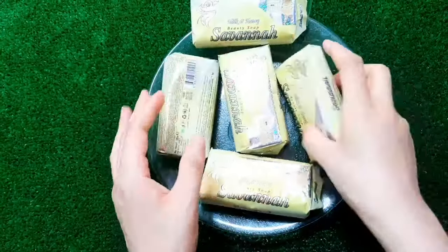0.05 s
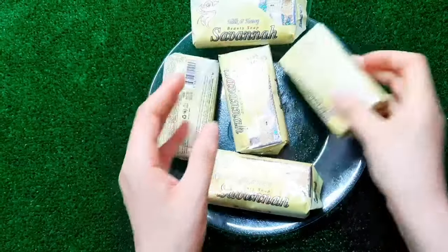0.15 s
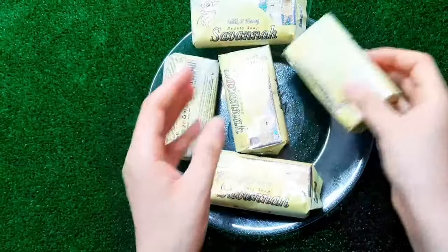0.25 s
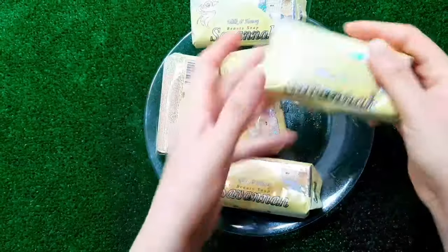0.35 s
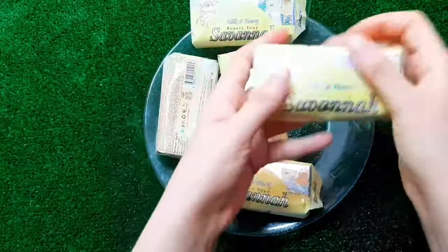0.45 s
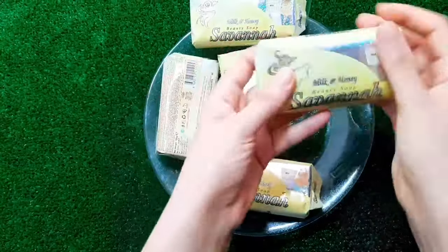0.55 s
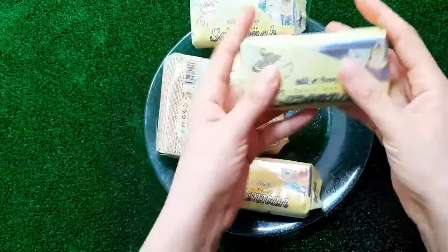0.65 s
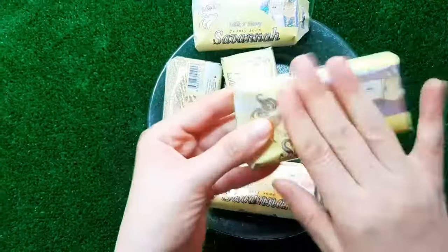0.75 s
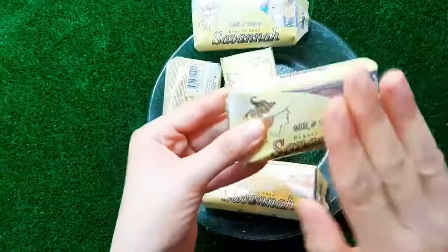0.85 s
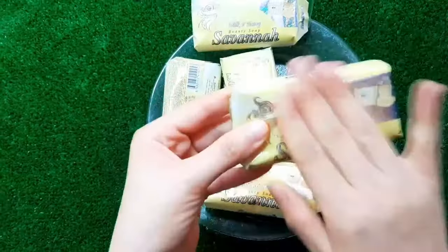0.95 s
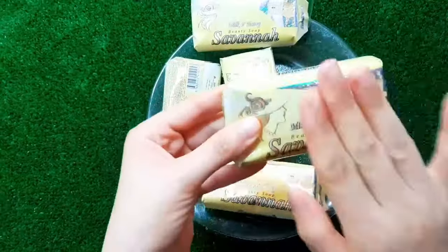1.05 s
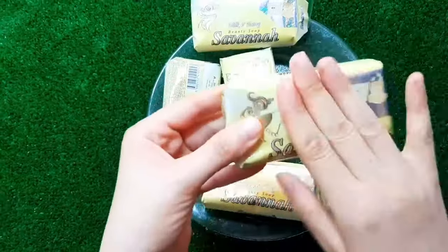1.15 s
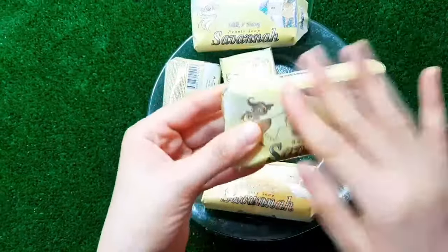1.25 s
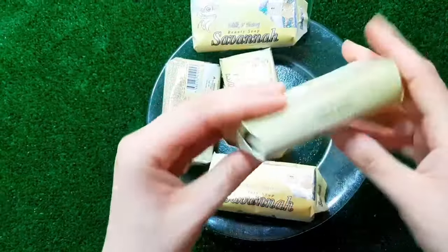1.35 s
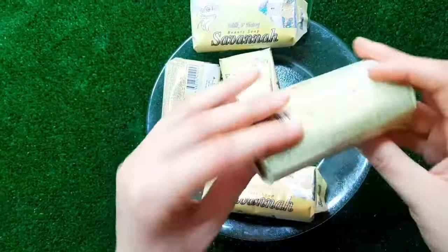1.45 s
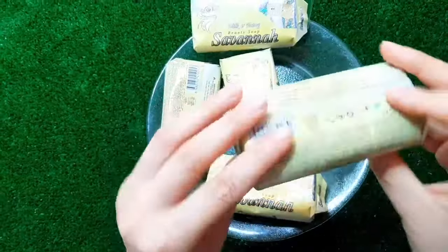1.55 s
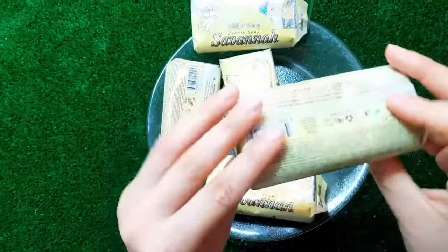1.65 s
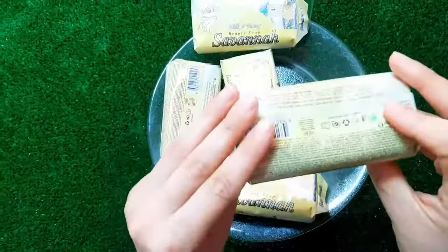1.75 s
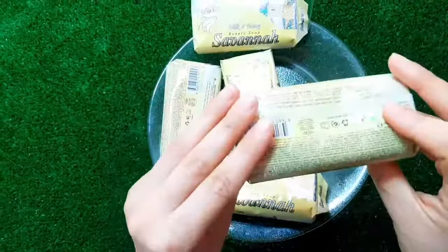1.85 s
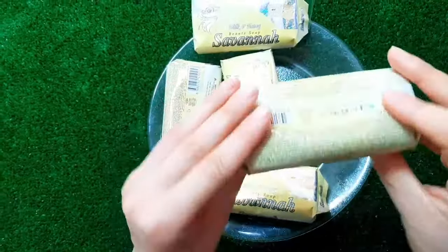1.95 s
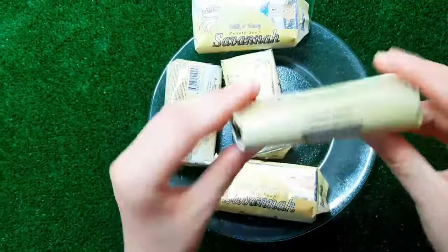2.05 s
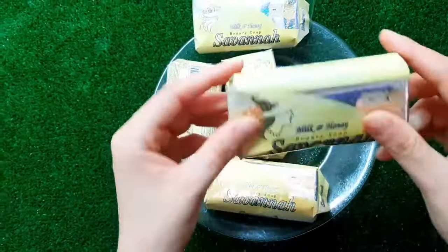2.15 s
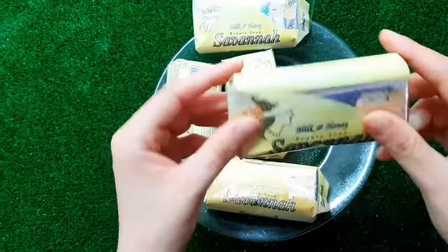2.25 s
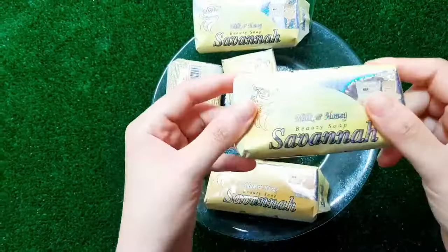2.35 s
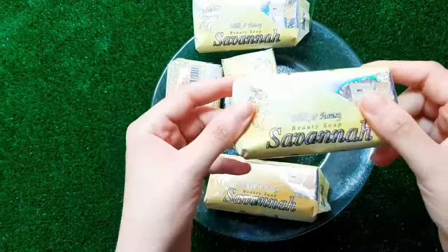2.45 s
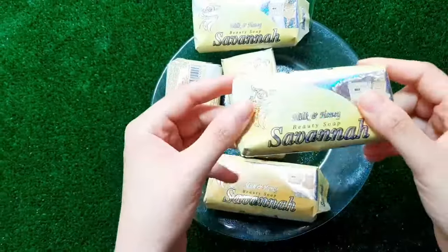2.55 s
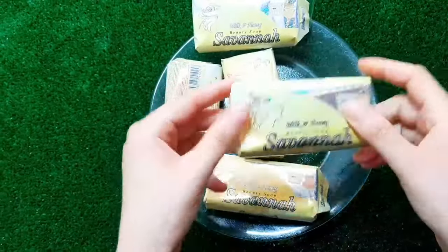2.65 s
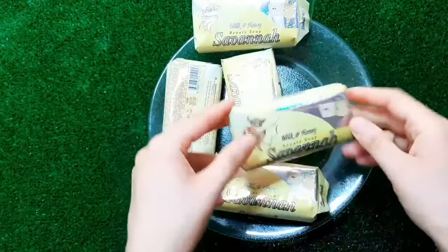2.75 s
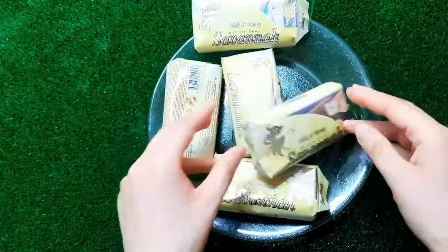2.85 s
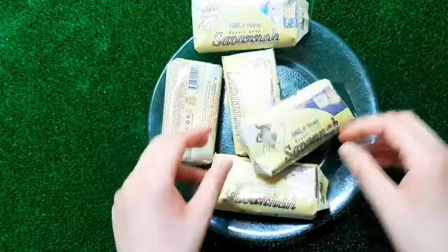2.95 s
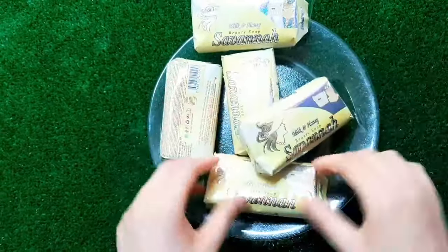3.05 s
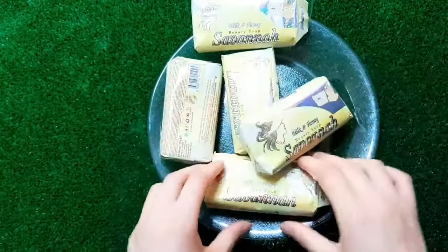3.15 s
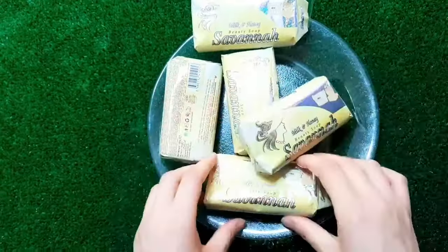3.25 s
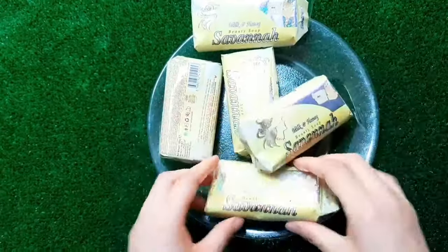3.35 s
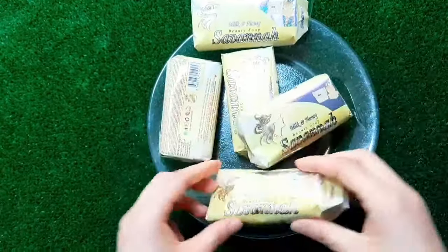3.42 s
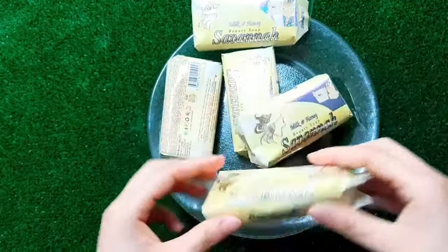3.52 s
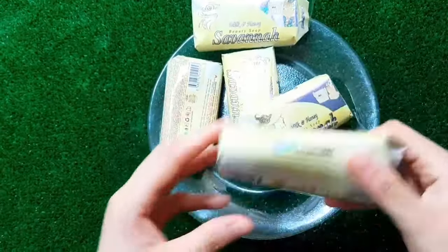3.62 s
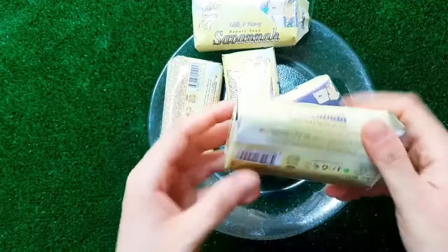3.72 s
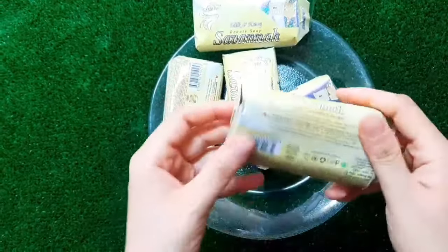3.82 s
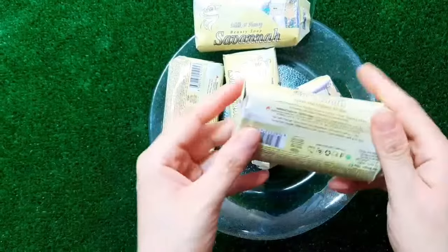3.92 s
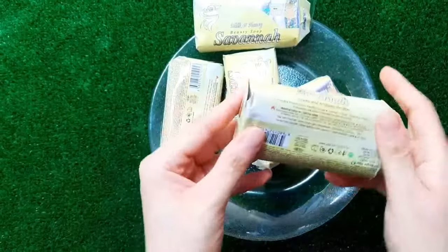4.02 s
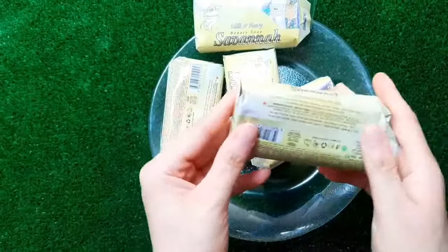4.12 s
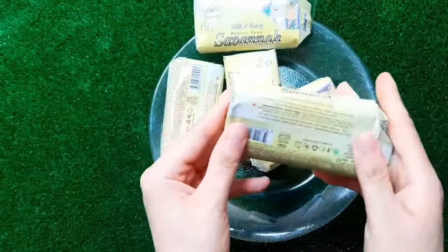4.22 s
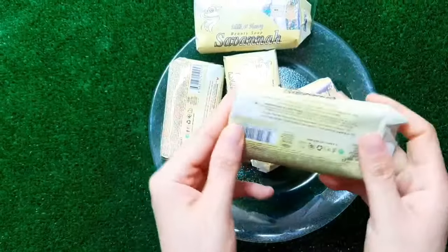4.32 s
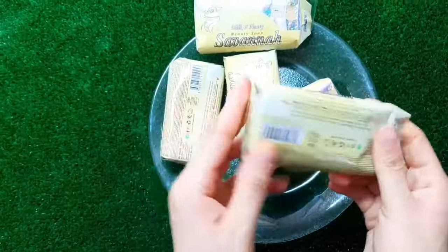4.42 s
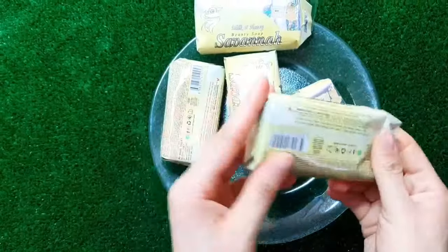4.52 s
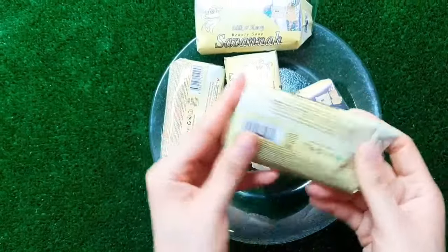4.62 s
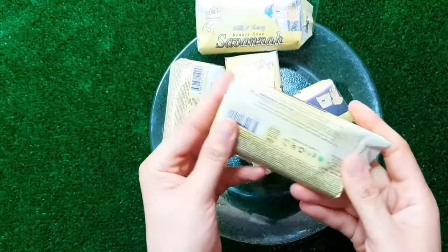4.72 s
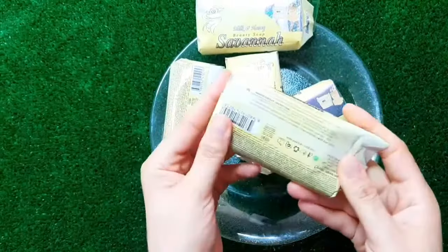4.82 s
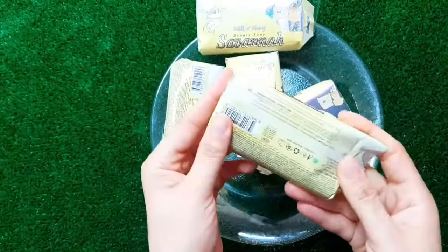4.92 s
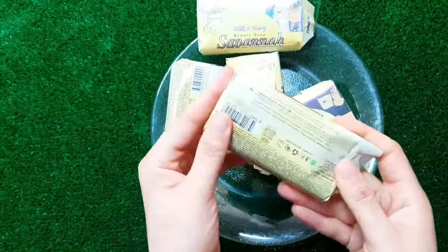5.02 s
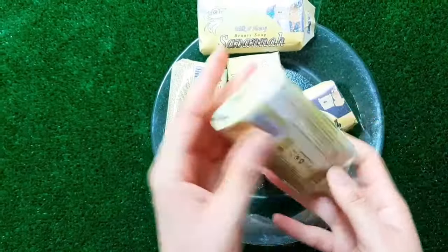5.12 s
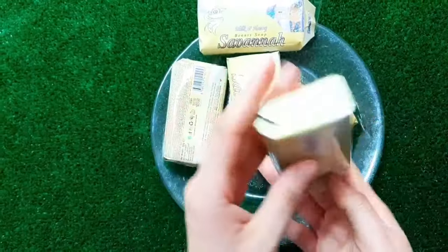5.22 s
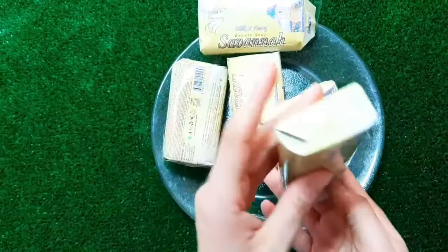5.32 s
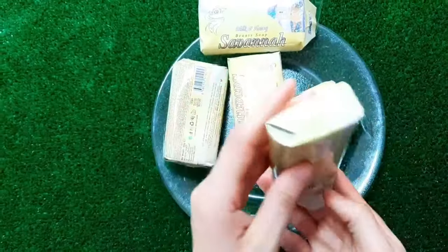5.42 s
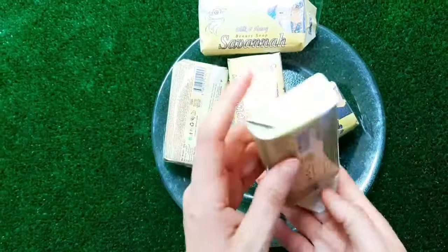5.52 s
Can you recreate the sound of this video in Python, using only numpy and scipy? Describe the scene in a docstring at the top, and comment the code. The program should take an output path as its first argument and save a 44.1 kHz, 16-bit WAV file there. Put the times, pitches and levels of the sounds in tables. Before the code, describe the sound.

In a small room, close to the left microphone, fingers slide over the paper wrapper of a soap bar and give it three sharp pats. After a few more crinkles the bar lands loudly on a glass plate, which rings briefly over a low boom. Irregular snaps and rustles follow as the next bar is turned over. The right microphone carries little but low rumble and a few soft bumps.

```python
"""Paper wrappers rustle and snap close by as hands turn soap bars over a glass plate in a small room.
Fingers slap one bar three times; it is set down with a hard clack that rings the glass and draws a low
boom from the room, and the next is picked up. The left microphone hears it all and overloads on the
hardest blows; the right one is nearly deaf and carries rumble and soft thumps."""
import sys
import numpy as np
from scipy import signal
from scipy.fft import rfft, irfft, next_fast_len
from scipy.io import wavfile
from scipy.ndimage import map_coordinates

SR = 44100
rng = np.random.default_rng(int(sys.argv[2]) if len(sys.argv) > 2 else 0)


def generate_wav(sig):
    """Save sig (samples, or channels by samples) to the path in sys.argv[1] as 16-bit PCM at SR."""
    pcm = np.round(np.clip(np.atleast_2d(sig).T, -1, 1) * 32767).astype(np.int16)
    wavfile.write(sys.argv[1], SR, pcm)


N = 245637


def strokes():
    """Skin drags slowly over paper as a bar is lifted or turned."""
    # drags of the fingers: start/s, end/s, level/dB, brightness/dB
    drags = [(-0.02, 0.062, -55.5, -6), (0.06, 0.353, -65, -2.5), (0.45, 0.702, -58.5, 1),
             (1.263, 1.417, -55, 2.5), (1.409, 1.61, -65.5, 7.5), (2.011, 2.19, -55.5, 3),
             (2.573, 2.746, -62, 10), (2.759, 2.807, -46.5, 3.5), (2.951, 3.035, -53, -6.5),
             (3.053, 3.174, -58.5, -1.5), (3.17, 3.317, -67, 1), (3.307, 3.454, -54.5, 2.5),
             (3.427, 3.595, -59, -7.5), (3.634, 4.007, -59, -2), (4.065, 4.226, -65.5, -9),
             (4.238, 4.337, -51.5, -5), (4.334, 4.48, -54, 5), (4.485, 4.625, -66, 0.5),
             (4.657, 4.727, -59.5, -6.5), (4.94, 5.092, -65, 3), (5.046, 5.209, -55, 2.5),
             (5.29, 5.38, -56, -2), (5.384, 5.492, -63.5, 0)]
    parts = friction(ticks_per_s=900, spread_db=4, hiss=.6)
    out = slide(parts, db=-74.5, brightness_db=5)  # a held wrapper never lies quite still
    for start, end, db, brightness_db in drags:
        out += gesture(start, end, rise=0.029, fall=0.0086) * slide(parts, db, brightness_db)
    return out


def swipes():
    """A faster finger packs the ticks into a short swish."""
    # swipes along a wrapper: start/s, end/s, level/dB, brightness/dB
    swishes = [(0.414, 0.451, -41, 3.5), (0.479, 0.511, -40, 3), (0.604, 0.643, -51, 13.5),
               (1.317, 1.385, -43, 3), (2.032, 2.087, -46, 9), (3.096, 3.122, -47.5, 4.5),
               (3.281, 3.324, -47, 2.5), (3.627, 3.645, -39, 1), (3.723, 3.752, -39, 3),
               (4.039, 4.109, -46, -2.5), (4.27, 4.29, -47, -1), (4.627, 4.667, -38, 3),
               (5.104, 5.166, -48, 1), (5.24, 5.288, -45, 15), (5.436, 5.462, -46.5, 9)]
    parts = friction(ticks_per_s=2200, spread_db=2, hiss=0.4)
    out = np.zeros(N)
    for start, end, db, brightness_db in swishes:
        length = end - start
        out += gesture(start, end, rise=.4 * length, fall=.45 * length) * slide(parts, db, brightness_db)
    return out


def friction(ticks_per_s, spread_db, hiss):
    """Clumps of stick-slip ticks, larger crackles and hiss drive a dull rub, a rustle and a fine fizz."""
    # spectra of skin on paper: f/Hz, level/dB
    rub = [(120, -23), (300, 1.5), (650, -6), (1100, 0.5), (1800, -6.5), (3000, -22), (6000, -50.5)]
    rustle = [(900, -34), (2200, 0.5), (4000, 0.5), (6600, 0), (7800, -15), (11000, -37.5)]
    fizz = [(6000, -20), (7800, -1.5), (11500, 14), (16000, 5.5)]
    sizes = rng.choice([-1, 1], N) * amp(spread_db * np.clip(rng.standard_normal(N), -2, 2))
    chance = rng.random(N) * SR
    ticks = unit(sizes * (chance < ticks_per_s))
    crackles = 0.47 * unit(sizes * (chance < 70))
    clumps = map_coordinates(rng.standard_normal(N // 700 + 4), [np.arange(N) / 700])
    slips = (ticks + crackles + hiss * rng.standard_normal(N)) * amp(2.2 * clumps - 1.3)
    return [shaped(slips, spectrum) for spectrum in (rub, rustle, fizz)]


def slide(parts, db, brightness_db):
    """A light, bright touch trades the dull rub for fizz."""
    rub, rustle, fizz = parts
    return amp(db) * (amp(-brightness_db) * rub + rustle + amp(-12.5 + .4 * brightness_db) * fizz)


def snaps():
    """A crease flips in a millisecond and rings its patch of paper, most strongly near its pitch."""
    # creases that buckle: t/s, level/dB, pitch/Hz
    creases = [(0.1406, -51, 5000), (0.21, -48, 5000), (0.4952, -36.5, 3300), (0.564, -44, 1700),
               (0.655, -32, 5800), (0.7074, -36.5, 1600), (0.716, -29.5, 4670), (1.253, -34.5, 4320),
               (1.2894, -19.5, 3700), (1.565, -36, 5570), (2.041, -32, 7900), (2.0565, -22.5, 7600),
               (2.17, -34, 7600), (2.6596, -44.5, 4500), (2.6907, -47, 2000), (2.7364, -37.5, 1100),
               (2.977, -27.5, 2470), (3.098, -31, 3060), (3.292, -36, 4600), (3.631, -27, 2640),
               (3.8138, -26.5, 3900), (3.8307, -24, 1710), (3.853, -25.5, 5440), (3.907, -26, 2620),
               (3.9471, -28.5, 3800), (4.0087, -41, 6000), (4.0991, -26.5, 8500), (4.1948, -25, 2600),
               (4.239, -32.5, 3400), (4.2636, -29.5, 1420), (4.2849, -24, 3570), (4.3132, -29, 2700),
               (4.3692, -23.5, 3880), (4.466, -41.5, 6300), (4.5841, -22.5, 5730), (4.7042, -34, 2380),
               (5.0912, -32, 2600), (5.2568, -28.5, 3480), (5.31, -24.5, 2520), (5.36, -42, 2000),
               (5.4104, -36, 1280)]
    # pop, crack, tick and sizzle: low/Hz, high/Hz
    bands = [(850, 2200), (2200, 4400), (4400, 6700), (7300, 16000)]
    paper_db, fall_db_per_octave = np.array([1.5, -3.5, -1.5, -7.5]), 11
    out = np.zeros(N)
    for s, db, pitch_hz in creases:
        octaves_off = np.abs(np.log2(centres(bands) / pitch_hz))
        levels = db + paper_db - fall_db_per_octave * octaves_off
        add(out, s, blow(bands, levels, fall=0.0016, ring_cycles=1.0))
    return out


def slaps_and_sharp_snaps():
    """Finger slaps on the wrapped bar, plus two sharp snaps; the room or plate rings briefly after each."""
    # slaps, and snaps at 2.18 and 3.48 s: t/s, smack/dB, hardness/(dB per octave), thud/dB, sizzle/dB
    hits = [(0.575, -35.5, -5.5, -27, -50), (0.7502, -15.5, -2.2, -13.5, -23),
            (0.9619, -15, 2.5, -17, -28.5), (1.1282, -17, 1.94, -19, -29.5),
            (2.1772, -31.5, -.5, -45.5, -52), (3.4039, -42.5, -11, -38.5, -65),
            (3.4763, -17.5, 1.6, -30, -29)]
    # the thud, four bands of smack, the sizzle: low/Hz, high/Hz
    bands = [(170, 480), (720, 1250), (1250, 2400), (2400, 4400), (4400, 6700), (7300, 16000)]
    # hollow ring of the room or plate: f/Hz, level/dB, t60/s
    ring_modes = [(358, -8, 0.14), (485, -20, 0.072), (1010, -9, 0.08)]
    colour_db, pivot_hz = np.array([-1, 0.33, 1, 0.89]), 3120
    octaves = np.log2(centres(bands[1:-1]) / pivot_hz)
    out, t = np.zeros(N), clock(8192)
    for s, smack_db, hardness, thud_db, sizzle_db in hits:
        smack = smack_db + colour_db + hardness * octaves
        softness = amp(.5 * (thud_db - smack_db))  # a dull contact lasts longer than a sharp one
        add(out, s, blow(bands, [thud_db, *smack, sizzle_db], fall=.0019 * softness, ring_cycles=0.3))
        for hz, db, t60 in ring_modes:
            note = np.sin(2 * np.pi * (hz * t + rng.random())) * (1 - np.exp(-t / 0.0021))
            add(out, s, amp(thud_db + db - 60 * t / t60) * note)
    return out


def landing():
    """The bar lands and rocks: each contact crushes the wrapper and rings the loaded plate."""
    # contacts with the plate: t/s, level/dB, favoured f/Hz
    contacts = [(2.8149, -15, 1740), (2.8222, -4, 1600), (2.848, -18.5, 1410), (2.884, -30, 1440),
                (2.8895, -24.5, 1060), (2.92, -34, 1010)]
    # modes of the glass: f/Hz, level/dB, t60/s
    plate_modes = [(776, -28.5, 0.085), (1070, -19, 0.073), (1160, -22.5, 0.21), (1366, -10.5, 0.11),
                   (1470, -2, 0.027), (1640, -5, 0.085), (1890, -19, 0.037), (2080, -15, 0.067),
                   (3570, -15.5, 0.019), (3680, -18.5, 0.033), (4700, -23, 0.031), (6200, -29.5, 0.045)]
    # wrapper squashed under the bar: f/Hz, level/dB
    crush_spectrum = [(60, -13.5), (150, 5.5), (400, 1.5), (1200, 3), (4000, -3.5), (6700, -9.5),
                      (7800, -19), (16000, -28.5)]
    out, t = np.zeros(N), clock(8192)
    hz = np.fft.rfftfreq(len(t), 1 / SR)
    choke = (1 - np.exp(-t / 0.0012)) * np.exp(-(t / 0.023) ** 2)  # the settling bar damps the glass
    for s, db, favoured_hz in contacts:
        ring = np.zeros(len(t))
        for mode_hz, level_db, t60 in plate_modes:
            favour_db = 5 / (1 + ((mode_hz - favoured_hz) / 90) ** 2)
            chatter = np.cumsum(rng.standard_normal(len(t))) * .004
            tone = np.sin(2 * np.pi * (mode_hz * t + chatter + rng.random()))
            ring += amp(level_db + favour_db - 60 * t / t60) * tone
        crush = causal(burst(t, rise=0.0012, fall=0.022), along(crush_spectrum, hz))
        add(out, s, amp(db) * lasting(ring * choke, seconds=.009))
        add(out, s, amp(db - 5.5) * lasting(crush, seconds=0.0028))
    return out


def scrapes():
    """A sliding bar excites a single hollow resonance."""
    # slides of a bar: start/s, end/s, level/dB, f/Hz
    slides = [(0.183, 0.245, -64, 2740), (2.763, 2.805, -44, 1110), (3.398, 3.44, -42, 582),
              (3.56, 3.665, -50, 840), (3.938, 4.15, -55, 487), (4.569, 4.665, -47.5, 803)]
    out = np.zeros(N)
    for start, end, db, hz in slides:
        hollow = bandpass(rng.standard_normal(N), [hz / 1.08, hz * 1.08], order=2)
        out += amp(db) * gesture(start, end, rise=0.011, fall=0.018) * unit(hollow)
    return out


def low_boom():
    """A bump sets off a brief low ring of the room near 140 Hz."""
    # booms of the room's low mode: t/s, level/dB, f/Hz
    booms = [(2.843, -26, 138.8), (4.491, -36.5, 138.6)]
    out, t, t60 = np.zeros(N), clock(32768), .5
    for s, db, hz in booms:
        pair = np.sin(2 * np.pi * hz * t) + .5 * np.sin(2 * np.pi * 0.9 * hz * t)
        add(out, s, amp(db - 60 * t / t60) * (1 - np.exp(-t / 0.0013)) * pair)
    return out


def shuffle():
    """Low handling noise dies away after the first bar is lifted."""
    # f/Hz, level/dB
    spectrum = [(20, -3.5), (45, 2), (170, 3.5), (330, -11.5), (900, -20.5), (3000, -66.5)]
    return shaped(rng.standard_normal(N), spectrum) * amp(-44 - 17.5 * clock(N))  # fades 17.5 dB/s


def room(x, early_db, late_db):
    """Near surfaces answer within milliseconds, then the walls; the paths change as the hands move."""
    # decay of the room: f/Hz, t60/s
    decay = [(150, 0.7), (300, 0.26), (1200, 0.2), (5000, 0.23), (12000, 0.22)]
    # colour of its tail: f/Hz, level/dB
    colour = [(120, -4), (350, 2), (1200, 8.5), (4000, 2), (12000, 3.5)]
    out, t, block = np.zeros(N), clock(16384), SR // 6
    for start in range(0, N, block):
        hz, lag, noise = signal.stft(rng.standard_normal(len(t)), SR, nperseg=256)
        fading_db = along(colour, hz)[:, None] - 60 * lag / along(decay, hz)[:, None]
        late = signal.istft(noise * amp(fading_db), SR)[1] * (1 - np.exp(-t / 0.012))
        early = burst(t, rise=.0065, fall=0.0044)
        answer = amp(early_db) * early / np.linalg.norm(early)
        answer += amp(late_db) * late / np.linalg.norm(late)
        add(out, start / SR, signal.fftconvolve(x[start:start + block], answer))
    return out


def thumps():
    """A soft push on the right microphone: one or two slow swings after a brief harder edge."""
    # pushes: t/s, level/dB, f/Hz, edge/dB
    pushes = [(1.503, -22.5, 220, -47.5), (1.512, -23, 98, -56), (3.797, -37, 98, -60),
              (4.493, -31, 65.5, -56), (5.032, -23.5, 95, -44.5), (5.137, -26, 96, -55.5),
              (5.266, -26.5, 89, -78), (5.359, -28.5, 98, -74)]
    out, t = np.zeros(N), clock(4096)
    for s, db, hz, edge_db in pushes:
        age = t * hz / 0.38
        swell = (age * np.exp(1 - age)) ** 2
        add(out, s, amp(db + 6.0) * swell * np.sin(2 * np.pi * hz * t))
        add(out, s + 0.00056, blow([(240, 520)], [edge_db + 9.5], fall=0.0009, ring_cycles=0.28))
    return coloured(out, lambda hz: hz ** 2 / (hz ** 2 + 40 ** 2))  # low cut at 40 Hz


def hush():
    """Faint, steady background at the left microphone."""
    # noise floor: f/Hz, level/dB
    spectrum = [(25, -14.5), (60, -6.5), (150, 6.5), (220, 1.5), (320, -11), (500, -12), (900, -11.5),
                (1200, -26.5), (2500, -26.5), (16000, -28)]
    return amp(-58.5) * shaped(rng.standard_normal(N), spectrum)


def rumble():
    """Steady low noise on the right microphone."""
    # noise floor: f/Hz, level/dB
    spectrum = [(24, -21), (42, 7), (100, 4.5), (150, -5.5), (220, -14.5), (330, -22), (500, -32),
                (2000, -34.5), (16000, -36.5)]
    return amp(-52.0) * shaped(rng.standard_normal(N), spectrum)


def blow(bands, levels, fall, ring_cycles):
    """One sharp push rings each band at its own level (dB over 4 ms); low bands ring longer."""
    t = clock(2048)
    sound = np.zeros(len(t))
    for band, db in zip(bands, levels):
        puff = burst(t, rise=0.00081, fall=fall + ring_cycles / band[0])
        sound += amp(db) * lasting(bandpass(puff, band, order=4), seconds=.004)
    return sound


def burst(t, rise, fall):
    """A puff of noise that swells for rise seconds and then dies away."""
    swell = np.minimum(t / rise, 1) ** 4
    return rng.standard_normal(len(t)) * swell * np.exp(-np.maximum(t - rise, 0) / fall)


def gesture(start, end, rise, fall):
    """Gain of a movement that swells, holds and lets go."""
    return np.interp(clock(N), [start - rise, start + rise, end - fall, end + fall], [0, 1, 1, 0])


def bandpass(x, band, order):
    """Pass the band (low/Hz, high/Hz)."""
    return signal.sosfilt(signal.butter(order, band, 'bandpass', fs=SR, output='sos'), x)


def coloured(x, gain):
    """x times a gain that depends on frequency."""
    size = next_fast_len(N + 8192)
    return irfft(rfft(x, size) * gain(np.fft.rfftfreq(size, 1 / SR)), size)[..., :N]


def shaped(x, spectrum):
    """x filtered by the given spectrum, at rms 1."""
    return unit(coloured(x, lambda hz: amp(along(spectrum, hz))))


def causal(x, db):
    """A short sound through the minimum-phase filter with gain db at its FFT bins."""
    cepstrum = irfft(np.log(amp(db)))
    cepstrum[1:len(x) // 2] *= 2
    cepstrum[len(x) // 2 + 1:] = 0
    return irfft(rfft(x) * np.exp(rfft(cepstrum)))


def along(points, hz):
    """Read (f/Hz, value) points on a log axis."""
    freqs, values = np.transpose(points)
    return np.interp(np.log(hz + 1), np.log(freqs + 1), values)


def centres(bands):
    """Middle of each band on a log axis, Hz."""
    return np.sqrt(np.prod(bands, axis=1))


def amp(db):
    """Decibels to gain."""
    return 10 ** (np.asarray(db) / 20)


def unit(x):
    """Scale to rms 1."""
    return x / np.sqrt(np.mean(x ** 2) + 1e-20)


def lasting(x, seconds):
    """Scale x to the energy of an rms-1 sound of this length."""
    return x * np.sqrt(seconds * SR) / np.linalg.norm(x)


def clock(size):
    """Times of the first samples, s."""
    return np.arange(size) / SR


def add(track, s, sound):
    """Mix a sound into a track at time s."""
    start = max(round(s * SR), 0)
    track[start:start + len(sound)] += sound[:N - start]


def scene():
    """The handling reaches the left microphone from close by; only a trace gets into the right one."""
    sliding = strokes() + swipes() + scrapes()
    direct = sliding + snaps() + slaps_and_sharp_snaps() + landing()
    # crumpled paper sends a different waveform towards each wall, so the tails are diffuse
    outward = [sliding + amp(-1) * snaps() + amp(1.5) * slaps_and_sharp_snaps() + amp(-4) * landing()
               for wall in range(4)]
    echoes = sum(room(x, early_db=-17.5, late_db=-20.5) for x in outward)
    air = direct + echoes + low_boom() + shuffle()
    left = air + hush()
    trace = amp(-45.5) * air + room(outward[0], early_db=-44.5, late_db=-48.5)
    right = trace + thumps() + rumble()
    return np.array([left, right])


def record(dry):
    """The hardest blows flatten at full scale; the treble ends steeply at 16 kHz."""
    clipped = dry / (1 + np.abs(dry) ** 6) ** (1 / 6)
    return coloured(clipped, lambda hz: 1 / (1 + (hz / 16000) ** 120))


dry = scene()
out = record(dry)
generate_wav(out)
```